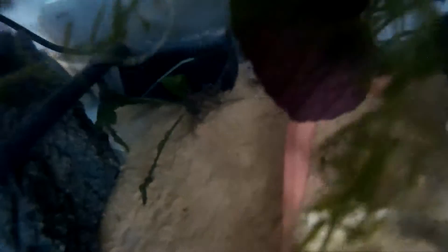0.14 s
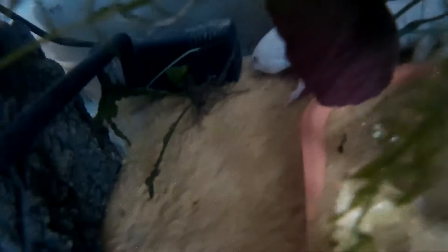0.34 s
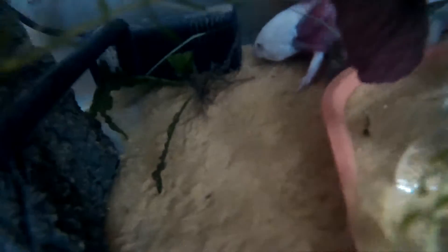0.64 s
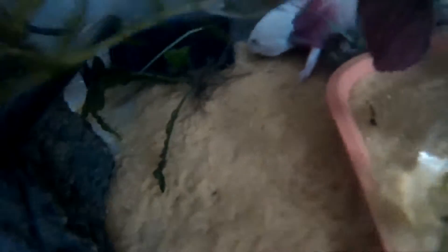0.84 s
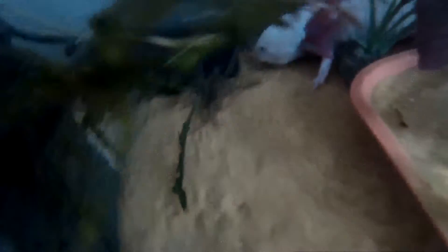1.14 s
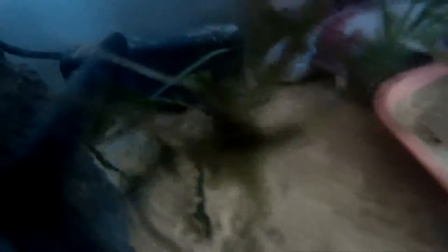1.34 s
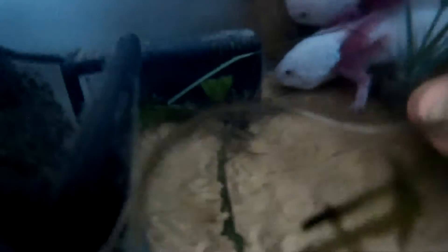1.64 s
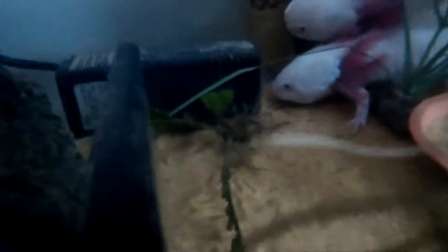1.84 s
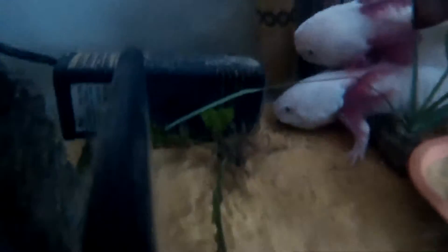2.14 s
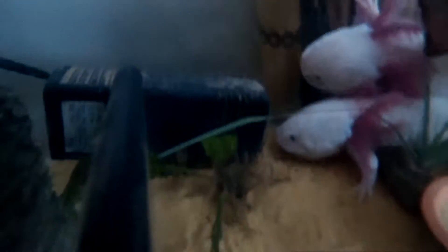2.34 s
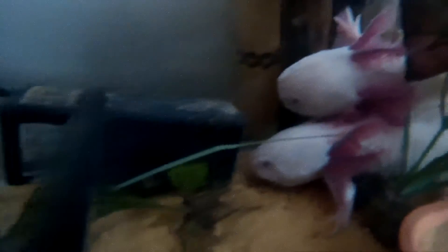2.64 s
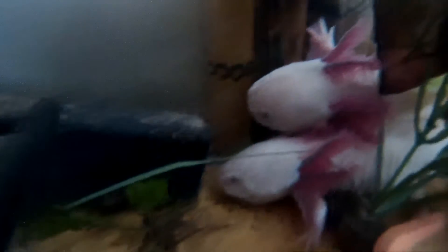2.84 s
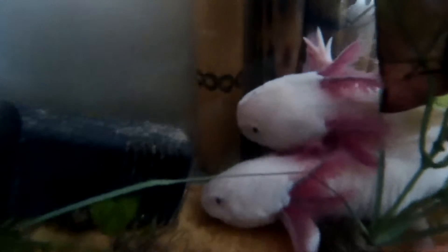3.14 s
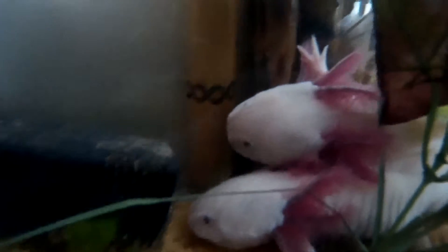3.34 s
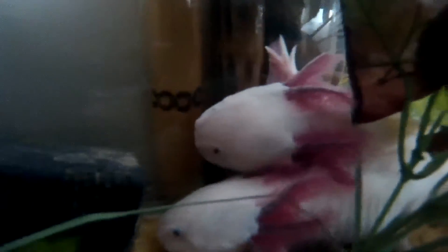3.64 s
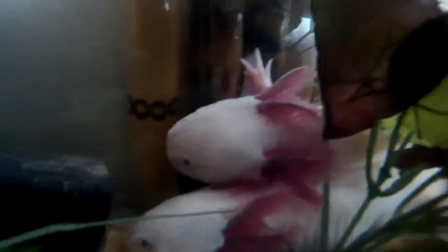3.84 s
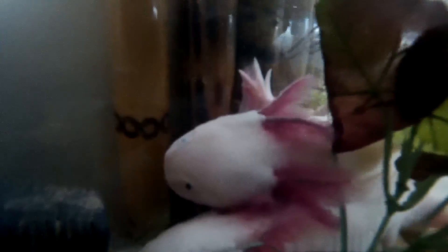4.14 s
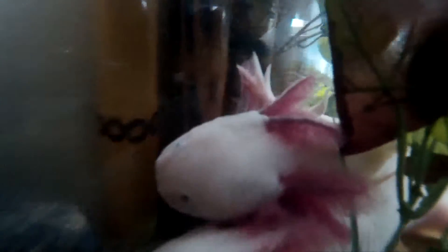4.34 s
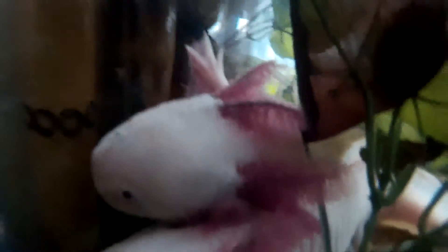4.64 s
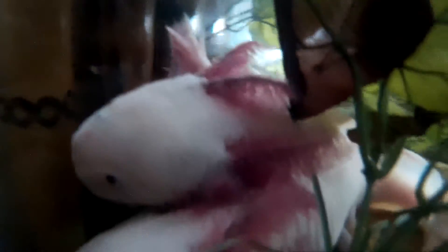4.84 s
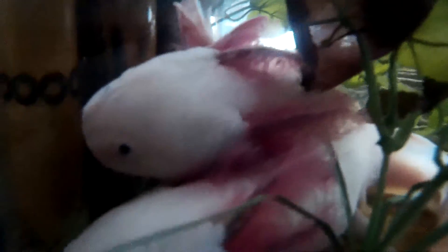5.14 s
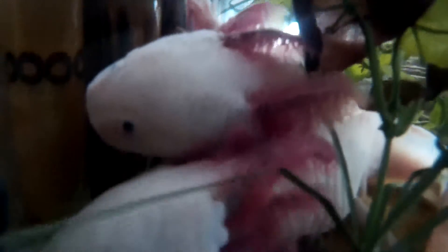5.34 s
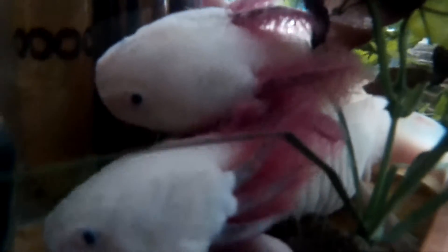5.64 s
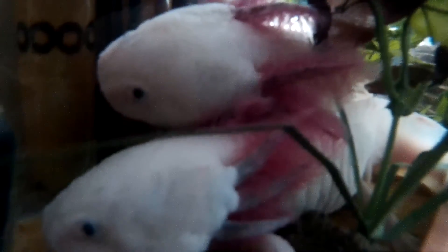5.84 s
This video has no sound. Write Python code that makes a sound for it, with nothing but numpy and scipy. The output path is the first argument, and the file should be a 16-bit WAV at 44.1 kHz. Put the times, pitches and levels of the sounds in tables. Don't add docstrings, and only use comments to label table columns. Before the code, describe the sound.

Inside a fish tank, a small sealed camera sits in near silence with soft hiss and faint hum. A very loud hollow clonk breaks in, then scraping, muffled bumps and a rapid cluster of hard knocks. Small dry ticks follow, and a low steady pump hum grows to the end. Close, boxy, mono pickup from within the housing.

```python
import sys
import numpy as np
from scipy import signal
from scipy.fft import rfft, irfft, next_fast_len
from scipy.io import wavfile
from scipy.ndimage import map_coordinates

SR = 44100
rng = np.random.default_rng(int(sys.argv[2]) if len(sys.argv) > 2 else 0)


def generate_wav(sig):
    pcm = np.round(np.clip(np.atleast_2d(sig).T, -1, 1) * 32767).astype(np.int16)
    wavfile.write(sys.argv[1], SR, pcm)


def attenuation_scalar(level_db):
    decades = np.asarray(level_db, float) / 20
    return 10 ** decades


N = 264159
MAINS_HZ = 50.0

# start_s, throb_100hz_db, overtones_db, tone_300hz_db, motor_noise_db
PUMP_CURVES = [(0, -67, -88, -90, -69.5), (.45, -63, -81.5, -90, -71.5), (1.0, -67, -85, -93, -78),
               (1.5, -62, -86.5, -85, -70), (2.3, -68, -82.5, -84, -73.5), (2.85, -67.5, -84.5, -83, -75.5),
               (3.4, -59, -79, -75, -66), (3.9, -59.5, -78, -77, -71.5), (4.35, -62.5, -74, -68.5, -71),
               (4.8, -60, -67, -66.5, -68), (5.25, -57, -63.5, -70.5, -65.5),
               (5.6, -52.5, -62.5, -77.5, -66.5), (5.99, -52, -62.5, -73, -64)]
# multiple_of_mains, level_db
PUMP_OVERTONES = [(3, -7.5), (4, 1), (5, -20), (8, -2), (9, -15.5), (10, -24.5), (12, -14.5), (14, -16),
                  (18, -29.5)]
# freq_hz, level_db
MOTOR_COLOUR = [(15, -44), (60, -6.5), (150, -3), (300, -6), (600, -11), (1800, -22.5), (3000, -33),
                (5000, -58)]
# freq_hz, level_db
HISS_COLOUR = [(100, 1.5), (1000, -2.5), (4000, -6.5), (9000, -8.5), (13000, -8), (16000, -12.5)]
# start_s, scrape_db, water_slosh_db
RUB_CURVES = [(0, -82, -67.5), (1.05, -94, -63.5), (1.1, -75, -64), (1.16, -65, -66), (1.25, -80, -60),
              (1.42, -76, -66), (1.5, -65, -69), (1.56, -66, -64), (1.6, -62, -52), (1.7, -64.5, -56),
              (1.8, -67, -65.5), (1.87, -64, -58), (1.95, -69, -48.5), (2.0, -65.5, -59), (2.07, -57, -54),
              (2.13, -62, -60), (2.2, -67, -59.5), (2.27, -59, -64.5), (2.32, -74, -61.5), (2.43, -51, -55),
              (2.5, -63, -57.5), (2.56, -66.5, -62), (2.7, -69.5, -65.5), (2.82, -71, -59),
              (3.0, -86, -66.5), (3.6, -78.5, -65.5), (4.5, -90, -65), (5.99, -87, -71.5)]
# freq_hz, level_db
SLOSH_COLOUR = [(8, -30.5), (20, 0.5), (60, -6), (120, -10), (300, -19), (800, -45)]
# pitch_hz, level_db, t60_s
SHELL_MODES = [(873, -1.5, 0.022), (1330, 1.5, .025), (1630, -1.5, 0.026), (1860, 1.5, 0.02),
               (2070, -5.5, .025), (2590, -4.5, 0.016), (3650, -6.5, .012), (4200, -20, .012)]
# start_s, ring_db, pitch_hz, t60_s, rise_s, crack_db
TICK_EVENTS = [(.4435, -47.5, 5440, 0.0067, .0015, -60), (.443, -51.5, 4130, 0.0071, .0005, -70.5),
               (1.204, -56, 830, 0.022, .001, -60.5), (1.22, -56, 1850, 0.017, 0.00091, -62.5),
               (1.363, -57.5, 480, 0.026, 0.00093, -70), (1.451, -52, 2230, .012, 0.00046, -56.5),
               (1.573, -41.5, 641, 0.51, 0.0087, -22.5), (2.164, -47, 1860, 0.01, .0005, -60),
               (2.177, -56, 2000, 0.0091, .0005, -60), (2.218, -52, 2010, 0.0086, .0003, -58),
               (2.3328, -23, 3720, 0.0098, 0.0011, -45.5), (2.335, -51, 1644, 0.094, .003, -80.5),
               (2.55, -56, 850, 0.031, 0.0021, -80), (3.2588, -51, 4300, .006, .0003, -45),
               (3.2625, -52.5, 1880, .015, .0005, -35), (3.287, -33.5, 1830, 0.018, 0.0017, -58),
               (3.29, -48, 730, 0.023, 0.0021, -77.5), (3.427, -51, 3060, 0.0066, .0003, -41),
               (3.428, -55.5, 724, 0.031, 0.00091, -80), (3.460, -42.5, 690, 0.036, .001, -75),
               (3.497, -31, 2766, 0.0074, 0.00076, -53.5), (3.5287, -37, 1955, 0.0091, 0.00021, -26.5),
               (3.529, -48, 706, .025, .001, -82), (3.567, -34.5, 698, 0.047, 0.0033, -66.5),
               (3.567, -43, 422, 0.042, 0.00089, -83), (3.62, -59, 710, 0.032, .002, -80),
               (3.685, -55.5, 718, .03, .001, -64), (3.686, -61, 1790, .015, .001, -80),
               (4.052, -62, 1680, .015, .001, -70), (4.053, -58.5, 727, .02, .001, -80),
               (4.088, -61.5, 2000, .015, 0.00093, -68.5), (4.683, -55, 1860, .012, .0005, -52.5)]
# start_s, low_mode_db, upper_mode_db, thump_db, shell_rattle_db, t60_s
KNOCK_EVENTS = [(1.5706, -5, -6, -27, -13.5, 0.032), (1.5865, -23, -22, -36, -37.5, 0.053),
                (1.605, -34, -27, -28, -35.5, 0.059), (1.611, -43, -42.5, -22, -48.5, .05),
                (1.648, -50, -46, -31.5, -50, 0.043), (1.715, -60, -49.5, -51, -47, .04),
                (1.8448, -42, -46, -27.5, -46.5, 0.033), (1.854, -45, -52, -45, -57, .03),
                (1.864, -13, -33, -12.5, -34, 0.029), (1.903, -39, -46, -31, -46, 0.017),
                (1.9121, -47, -40, -20, -50.5, 0.024), (1.922, -36.5, -54, -26, -54, .03),
                (1.930, -46, -55, -25, -60, 0.037), (1.948, -50, -49, -44, -53, 0.032),
                (2.037, -42, -47, -46, -47, .03), (2.056, -55, -43.5, -51.5, -53, 0.025),
                (2.068, -30, -43, -34, -46.5, 0.024), (2.095, -45, -54, -41, -54, .03),
                (2.116, -62, -55, -59, -50.5, .03), (2.3325, -26, -36.5, -29, -19.5, 0.036),
                (2.376, -26.5, -32.5, -26.5, -22.5, 0.039), (2.400, -0.5, -22, -33.5, -27.5, 0.019),
                (2.4195, -6, -28.5, -28, -29, 0.025), (2.443, -22, -31.5, -33.5, -29, 0.018),
                (2.455, -36, -42.5, -30, -48.5, 0.026), (2.462, -41, -52, -34, -47, .03),
                (2.4724, -10, -36.5, -49, -29.5, 0.028), (2.486, -44, -58.5, -45, -35, 0.033),
                (2.525, -63, -56.5, -55, -54, .03), (2.706, -57.5, -45.5, -55.5, -57, 0.025),
                (2.873, -63, -67, -50.5, -86, 0.036), (3.022, -63, -66, -52, -71, .03)]


def unit(x):
    return x / np.sqrt(np.mean(x ** 2) + 1e-20)


def curves(rows):
    start_s, *columns = np.transpose(rows)
    return [np.interp(np.arange(N) / SR, start_s, column) for column in columns]


def wobble(rate_hz):
    knots = rng.standard_normal(int(N * rate_hz / SR) + 4)
    return map_coordinates(knots, [np.arange(N) * rate_hz / SR])


def coloured_noise(colour):
    size = next_fast_len(N + 8192)
    hz, db = np.transpose(colour)
    bins_hz = np.fft.rfftfreq(size, 1 / SR)
    gain = attenuation_scalar(np.interp(np.log(bins_hz + 1), np.log(hz), db))
    white = rng.standard_normal(size)
    return unit(irfft(rfft(white) * gain, size)[:N])


def ring(t, hz, t60, rise):
    decay = attenuation_scalar(-60 * t / t60)
    onset = 1 - np.exp(-t / rise)
    return np.sin(2 * np.pi * hz * t) * decay * onset


def add(track, start_s, sound):
    track[round(start_s * SR):][:len(sound)] += sound


def pump():
    throb_db, overtones_db, third_db, noise_db = curves(PUMP_CURVES)
    mains_phase = 2 * np.pi * MAINS_HZ * np.arange(N) / SR

    def hum_line(multiple, db):
        level = np.sqrt(2) * attenuation_scalar(db + 0.8 * wobble(7.5))
        phase = multiple * mains_phase + multiple * multiple + 0.15 * wobble(5)
        return level * np.sin(phase)

    hum = hum_line(2, throb_db) + hum_line(6, third_db)
    for multiple, db in PUMP_OVERTONES:
        hum += hum_line(multiple, overtones_db + db)
    throbbing = 1 + 0.25 * np.sin(2 * mains_phase)
    motor = attenuation_scalar(noise_db + wobble(8)) * coloured_noise(MOTOR_COLOUR) * throbbing
    return hum + motor


def circuit():
    whine_hz, switch_hz = 9525.37, 36.36
    t = np.arange(N) / SR
    switch = np.tanh(5 * np.sin(2 * np.pi * switch_hz * (t - 0.0198)))
    whine = (attenuation_scalar(-80.0) + attenuation_scalar(-69.5) * switch) * np.sin(2 * np.pi * whine_hz * t)
    creep_db = np.interp(t, [0, 1.5, 2.5, 4, 6], [-5.5, -3, -2.5, -4, 0])
    return attenuation_scalar(creep_db) * whine + attenuation_scalar(-69) * coloured_noise(HISS_COLOUR)


def rubbing():
    scrape_db, slosh_db = curves(RUB_CURVES)
    clumping_db = 5 * wobble(70) + 3 * wobble(400)
    grains = rng.standard_normal(N) * attenuation_scalar(clumping_db)
    t = np.arange(SR // 16) / SR
    body = attenuation_scalar(6) * ring(t, 740, 0.012, 0.00023)
    for hz, db, t60 in SHELL_MODES:
        body += attenuation_scalar(db) * ring(t, hz, 0.6 * t60, 0.0003)
    scrape = unit(signal.fftconvolve(grains, body)[:N])
    slosh = unit(attenuation_scalar(3.4 * wobble(14)) * coloured_noise(SLOSH_COLOUR))
    return attenuation_scalar(scrape_db) * scrape + attenuation_scalar(slosh_db) * slosh


def ticks():
    track, t = np.zeros(N + SR), np.arange(SR // 2) / SR
    for start_s, ring_db, hz, t60, rise, crack_db in TICK_EVENTS:
        tone = ring(t, hz, t60, abs(rise) + 1e-4)
        tone = tone / np.abs(tone).max()
        crack = attenuation_scalar(-60 * t / 0.01) * np.diff(rng.standard_normal(len(t) + 1))
        add(track, start_s, attenuation_scalar(ring_db) * tone + attenuation_scalar(crack_db - 10.5) * crack)
    return track[:N]


def knocks():
    track, t = np.zeros(N + SR), np.arange(SR // 8) / SR
    chance = rng.standard_normal((len(KNOCK_EVENTS), len(SHELL_MODES) + 1))
    for (start_s, low_db, upper_db, thump_db, shell_db, t60), luck in zip(KNOCK_EVENTS, chance):
        cavity = attenuation_scalar(low_db + 1.5) * ring(t, 538, t60, 0.0008)
        cavity += attenuation_scalar(upper_db + 2.5) * ring(t, 738, t60, 0.0008)
        u = t / 0.00075
        thump = attenuation_scalar(thump_db + 10) * u * u * (1 - u / 1.6) * np.exp(-u)
        rattle = np.zeros(len(t))
        for (hz, db, wall_t60), vary in zip(SHELL_MODES, luck):
            rattle += attenuation_scalar(db + 4.5 * vary) * ring(t, hz * (1 + 0.01 * vary), wall_t60, 0.00036)
        softened = np.convolve(rng.standard_normal(len(t)), np.hanning(6), "same")
        grit = attenuation_scalar(-23.5 - 60 * t / 0.008) * softened
        add(track, start_s, cavity + thump + attenuation_scalar(shell_db - 4) * (rattle + grit))
    return track[:N]


def scene():
    mix = pump() + circuit() + rubbing() + ticks() + knocks()
    return mix[None]


def roll_off(x):
    return signal.sosfilt(signal.butter(12, 16320, fs=SR, output="sos"), x)


def record(dry):
    ceiling = 0.68
    clipped = dry / (1 + np.abs(dry / ceiling) ** 8) ** (1 / 8)
    return roll_off(clipped)


dry = scene()
out = record(dry)
generate_wav(out)
```